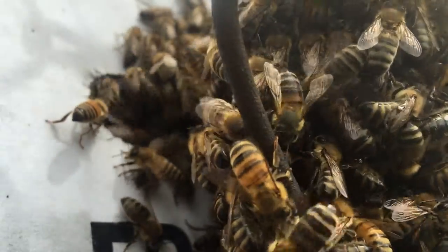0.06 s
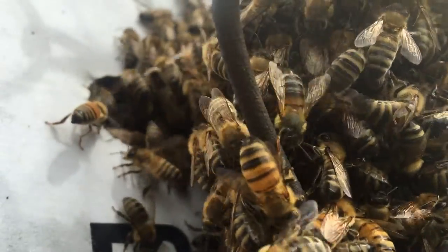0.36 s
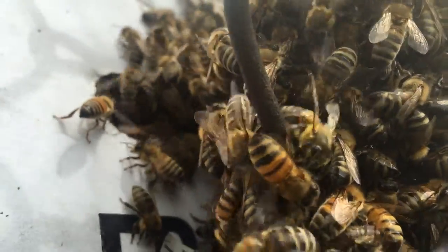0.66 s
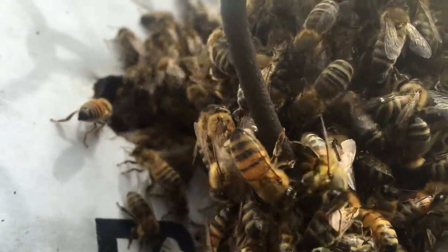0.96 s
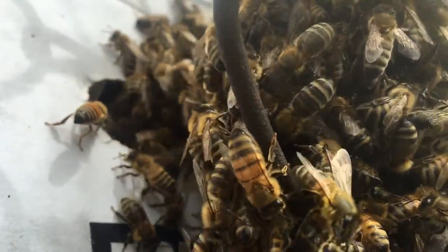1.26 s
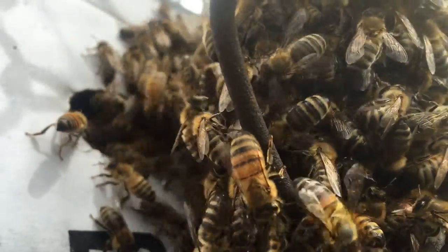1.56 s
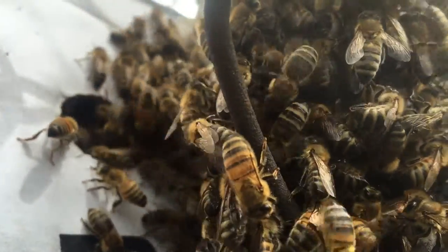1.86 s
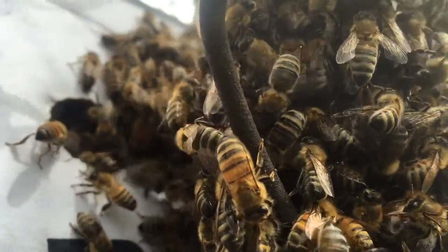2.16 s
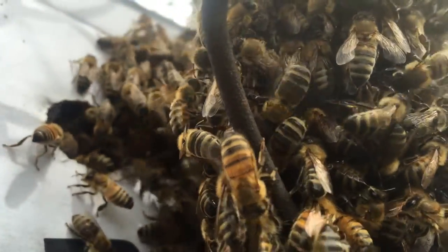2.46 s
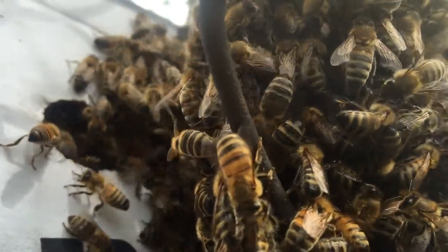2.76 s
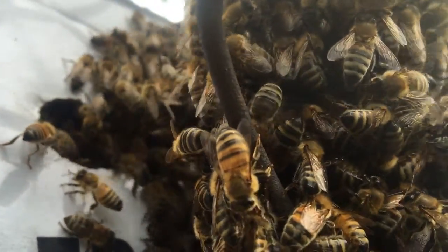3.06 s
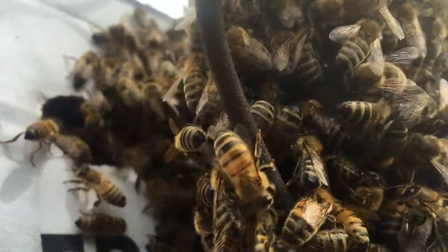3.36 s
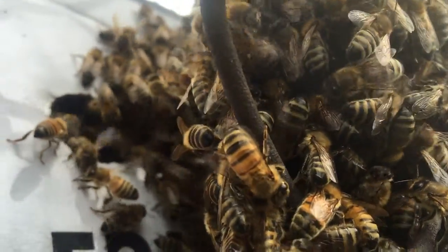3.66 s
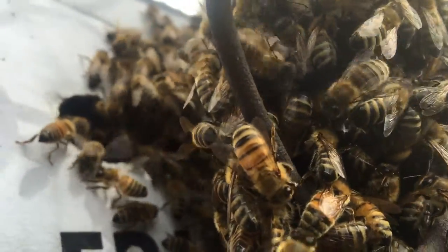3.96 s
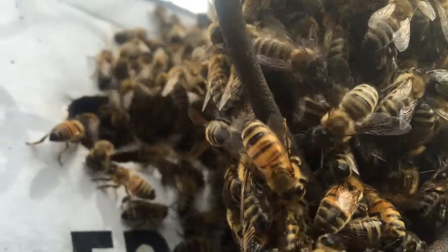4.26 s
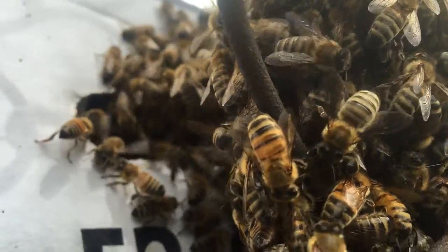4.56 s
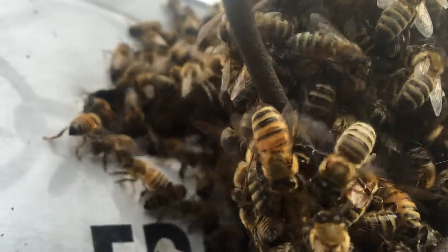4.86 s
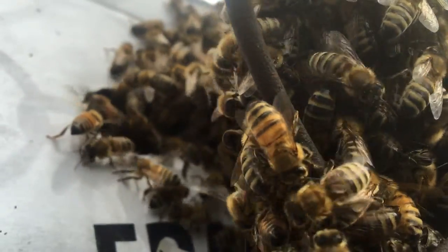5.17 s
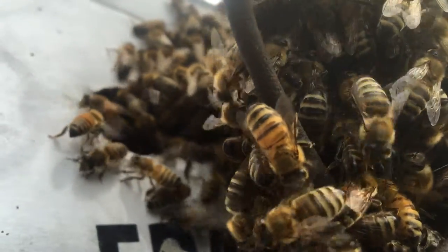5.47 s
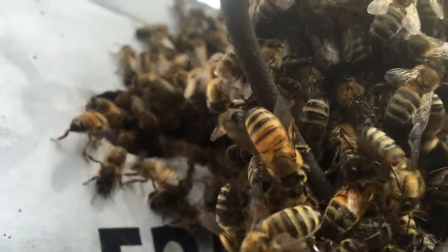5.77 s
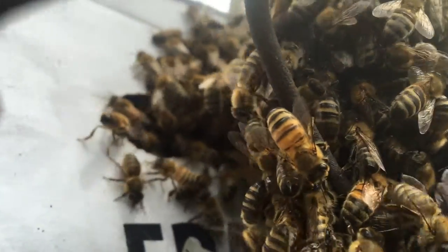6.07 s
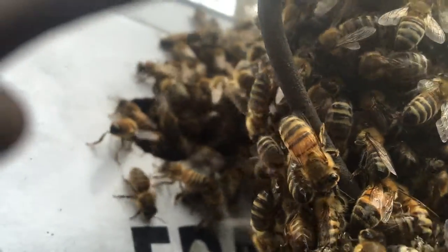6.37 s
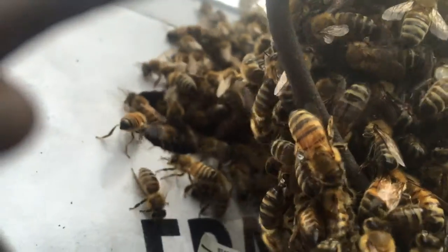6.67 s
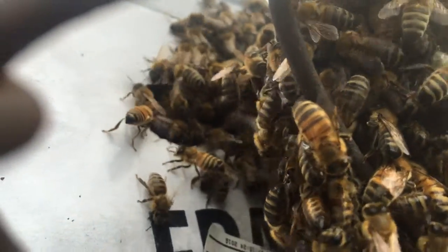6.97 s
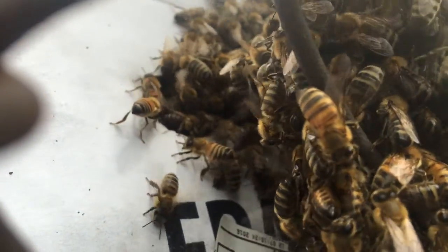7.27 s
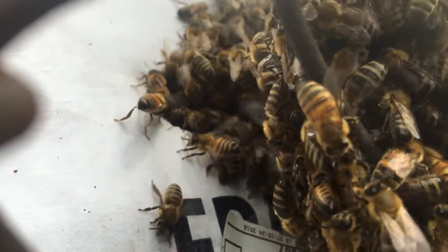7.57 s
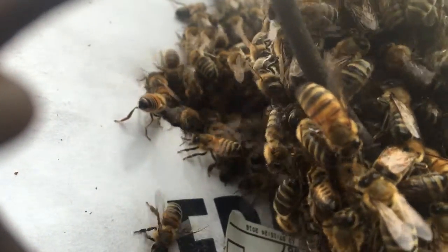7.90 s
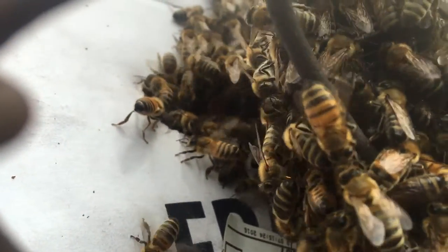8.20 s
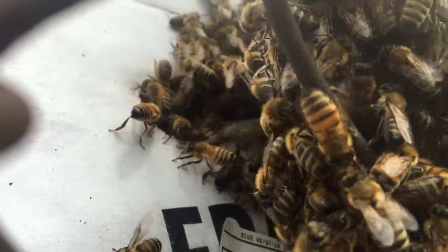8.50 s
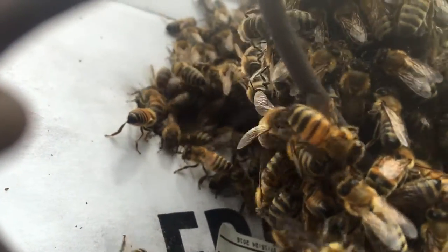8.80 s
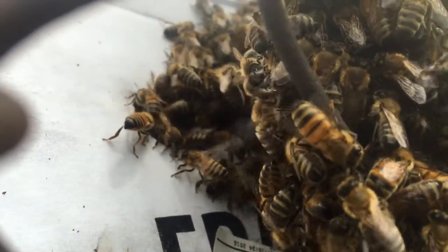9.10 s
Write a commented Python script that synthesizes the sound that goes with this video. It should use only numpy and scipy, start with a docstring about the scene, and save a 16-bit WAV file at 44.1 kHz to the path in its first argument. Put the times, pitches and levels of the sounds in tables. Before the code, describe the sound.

Close, steady hum and crawling rustle of many bees, with a few brief buzzes, early handling clicks and a low hand rumble.

```python
"""Honeybee cluster, close up

A hand-held camera's microphone is a few centimetres from the bees. Many wings hum near 190 Hz, one
air pulse a stroke; thousands of legs and wings rustle together, and now and then a jostled bee buzzes.
Fingers shift on the camera: sharp clicks of its case, dull bumps, short scuffs and a low rumble.
The camera adds a thin hiss of its own."""
import sys
import numpy as np
from scipy import signal
from scipy.fft import rfft, irfft, next_fast_len
from scipy.io import wavfile
from scipy.ndimage import map_coordinates

SR = 44100
rng = np.random.default_rng(int(sys.argv[2]) if len(sys.argv) > 2 else 0)


def wav_record(signal):
    """Record a signal, one row per channel, as 16-bit PCM in the file named by sys.argv[1]."""
    frames = np.transpose(np.atleast_2d(signal))
    bounded = np.clip(frames, -1, 1)
    # unit amplitude maps onto the largest positive 16-bit level
    quanta = np.round(bounded * 32767).astype(np.int16)
    wavfile.write(sys.argv[1], SR, quanta)


N = 403074

# how busy the cluster is; hum and rustle both follow it: (time [s], level [dB])
ACTIVITY = [(0.0, -52), (2.09, -51), (2.37, -54.5), (6.21, -52), (6.34, -52.5), (9.14, -52.5)]
# clicks of the case; low breadth is a narrow ring, high breadth a broad crack:
# (time [s], level [dB], breadth [dB], favoured ring [Hz], recoil relative to level [dB])
CASE_CLICKS = [(.5679, -7, 1, 2560, -9), (.641, -1.5, -7.5, 1890, -12), (0.7086, -9.5, -3, 3240, -14),
               (0.7223, -9, 5, 3840, -9), (0.7446, 0, -5, 3780, -20), (0.7492, -8.5, 3, 1690, -4.5),
               (0.7564, -2.5, -8, 1670, -14), (.7813, -25, 8, 4200, -12), (1.1286, -19, -11, 3050, -7),
               (1.1894, -9, -3, 4260, -29), (1.2322, -3, -7, 3100, -20), (1.282, 1.5, 6.5, 2850, -13),
               (1.2962, -6.5, 5.5, 3890, -21), (5.7585, -25.5, -12, 1130, -2.5),
               (5.8299, -33, -10, 2500, -17), (6.067, -29.5, -3, 3900, -8), (8.4202, -26, 0, 3870, -2.5),
               (8.4437, -26.5, 8, 1310, -2.5)]
# spectrum of a snap of the case: (frequency [Hz], level [dB])
SNAP_SPECTRUM = [(300, 3), (1500, -7.5), (3000, 2.5), (4300, -16), (5300, -15), (7000, -22), (10000, -22.5),
                 (16000, -39)]


def wing_hum():
    """Fanning bees hum low, a few nearest the microphone stand out, and a thin note holds steady."""
    # overtones of the crowd and of a bee close by: (frequency [Hz], level [dB])
    crowd_spectrum = [(100, -11), (170, -5), (390, 2), (520, -15), (650, -6), (900, -10), (1400, -13),
                      (2000, -16), (3000, -19.5), (5000, -43)]
    close_spectrum = [(100, 2.5), (170, 1.5), (370, 2), (500, -10.5), (640, 0), (850, -9), (1300, -6.5),
                      (2000, -19), (2950, -10.5), (3500, -20.5), (4100, -15.5), (4900, -35), (6200, -28.5),
                      (9000, -45)]
    busy_db, = curves(ACTIVITY)
    hum_db = 0.5 + busy_db.mean() + 0.26 * (busy_db - busy_db.mean())  # follows the activity weakly
    crowd = wings(crowd_spectrum, 157.86, 220.6, drift=.025, flutter=.008, swell_db=3.5, count=10)
    close = wings(close_spectrum, 166, 204, drift=.025, flutter=.004, swell_db=7, count=3)
    held = amp(1.2 * wobble(2.17)) * np.sin(2 * np.pi * np.cumsum(273 + 1.14 * wobble(4)) / SR)
    return amp(hum_db) * (amp(2.0) * crowd + amp(0.4) * close + amp(-9.5) * held)


def wings(spectrum, low_hz, high_hz, drift, flutter, swell_db, count):
    """Each bee beats at its own wandering pitch, one air pulse a stroke, and swells and fades."""
    strokes = np.zeros(N + 1)
    for pitch_hz in np.linspace(low_hz, high_hz, count):
        beat_hz = pitch_hz * (1 + drift * wobble(3) + flutter * wobble(35))
        turns = np.cumsum(beat_hz) / SR + rng.random()
        at = np.interp(np.arange(1, int(turns[-1])), turns, np.arange(N))
        whole = at.astype(int)
        size = amp(swell_db * np.tanh(wobble(3.5)[whole]))
        strokes[whole] += size * (1 - at % 1)  # each pulse is shared between two samples
        strokes[whole + 1] += size * (at % 1)
    return coloured(strokes[:N], spectrum)


def rustle():
    """Legs and wings of crawling bees rub together in thousands of tiny contacts a second."""
    # spectrum of the rubbing: (frequency [Hz], level [dB])
    spectrum = [(100, -39), (300, 6), (700, 0.5), (1350, 1.5), (1650, -5.5), (2100, -6), (2550, -3),
                (2950, 3), (3500, -11), (4100, -2), (4700, -14), (6900, -26), (7600, -30), (15000, -63)]
    busy_db, = curves(ACTIVITY)
    crawl = coloured(grains(per_s=6000, spread_db=1.5) + 0.54 * rng.standard_normal(N), spectrum)
    return amp(busy_db + 4.5 + 0.83 * wobble(16)) * crawl


def buzzes():
    """A jostled bee's wings flare up for a moment: a gliding train of sharp strokes."""
    # brief buzzes: (time [s], level [dB], pitch [Hz], glide [Hz/s], half length [s])
    flares = [(1.798, -55.5, 235.5, -12, 0.087), (2.22, -62, 201, 61, 0.089), (4.027, -58, 223.7, 4, 0.13),
              (7.773, -54, 283, 0, 0.036), (8.831, -58.5, 261.5, -64, 0.13)]
    # overtones of a buzz: (frequency [Hz], level [dB])
    spectrum = [(300, -16), (2000, -6), (2900, 1.5), (4300, -3.5), (5000, -20), (6200, -14), (10000, -31)]
    out, t = np.zeros(N), np.arange(-SR // 3, SR // 3) / SR
    for s, db, pitch_hz, glide, half in flares:
        turns = pitch_hz * t + glide * t ** 2 / 2
        strokes = np.cos(2 * np.pi * np.arange(1, 36)[:, None] * turns).sum(0)
        add(out, s + t[0], amp(db) * np.exp(-(t / half) ** 2) * coloured(strokes, spectrum))
    return out


def clicks():
    """A slip of the grip snaps the case and the camera recoils; the spot struck decides the ring."""
    # modes of the case: (frequency [Hz], level [dB], time to fall 60 dB [s])
    case_modes = [(535, -14.5, 0.033), (1210, -18, 0.029), (1640, -9, 0.022), (1853, -13.5, 0.023),
                  (2410, -44, .014), (3073, -2.5, 0.011), (3580, -2.5, 0.0081), (3920, 0.5, 0.0075),
                  (4180, 5, 0.0058), (6520, -14, 0.0096)]
    out, t = np.zeros(N), np.arange(SR // 16) / SR
    hz, level_db, t60 = np.transpose(case_modes)[:, :, None]
    for s, db, breadth_db, ring_hz, recoil_db in CASE_CLICKS:
        strength, detune, phase = rng.standard_normal((3, len(case_modes), 1))
        favour_db = 7 * np.exp(-(np.log(hz / ring_hz) / 0.1) ** 2)
        decay = amp(level_db + favour_db + 2 * strength - 60 * t / t60)
        modes = decay * np.sin(2 * np.pi * (hz * (1 + 0.022 * detune) * t + phase))
        snap = coloured(rng.standard_normal(len(t)), SNAP_SPECTRUM) * amp(-60 * t / 0.0069)
        contact = modes.sum(0) * (1 - np.exp(-t / 0.00045)) + 0.88 * snap * (1 - np.exp(-t / 0.00009))
        tone = [(1200, 2 + breadth_db), (2800, 0), (4500, 0), (7000, 1.5 + breadth_db)]
        add(out, s, amp(db - 24.5) * coloured(contact, tone))
        add(out, s + .0015, amp(db + recoil_db) * swing(start_hz=236, final_hz=78.5))
    return out


def chatter():
    """After each click the case settles with a few fine, bright ticks."""
    strain, t = np.zeros(N), np.arange(SR // 5) / SR
    for s, db, *_ in CASE_CLICKS:
        add(strain, s, amp(db - 40.5) * np.exp(-t / 0.015))
    ticks = coloured(grains(per_s=260, spread_db=1), SNAP_SPECTRUM)
    return strain * unit(passed(ticks, 5900, "high", order=2))


def bumps():
    """Soft fingertips push the camera without a click."""
    # pushes of the hand: (time [s], peak [dB], starting pitch [Hz], final pitch [Hz])
    pushes = [(1.661, -31, 300, 108), (1.816, -30.5, 257, 112), (2.076, -21, 316, 51.7),
              (2.309, -8.5, 308, 55.6), (2.486, -18, 261, 55), (2.668, -30, 298, 145),
              (4.002, -21, 109, 59.5), (5.408, -36.5, 330, 170), (5.709, -26.5, 129, 54.6),
              (7.864, -29.5, 160, 84.6)]
    out = np.zeros(N)
    for s, db, start_hz, final_hz in pushes:
        add(out, s, amp(db) * swing(start_hz, final_hz))
    return out


def swing(start_hz, final_hz, settle_s=0.0028, t60_s=0.11):
    """A push swings the camera; its pitch sinks as the finger gives way. Peak 1."""
    t = np.arange(SR // 3) / SR
    pitch = final_hz + (start_hz - final_hz) * np.exp(-t / settle_s)
    motion = np.sin(2 * np.pi * np.cumsum(pitch) / SR) * amp(-60 * t / t60_s)
    push = passed(motion, 1.54 * start_hz, "low", order=3)
    return push / np.abs(push).max()


def handling_noises():
    """Short handling noises: grainy scuffs, one dull knock and a low lingering rumble."""
    # bursts of noise: (time [s], level [dB], rise [s], fall [s], low-pass cutoff [Hz])
    bursts = [(.742, -37, 0.028, .02, 14000), (1.02, -41, 0.056, 0.064, 2540),
              (1.29, -25, .006, 0.036, 16000), (1.32, -23, 0.062, 0.082, 298),
              (2.078, -24.5, .0015, .004, 1400), (5.77, -48, 0.023, 0.043, 4970),
              (6.075, -37, 0.027, 0.064, 5100), (6.16, -43, 0.02, 0.033, 2200)]
    # their shared spectrum: (frequency [Hz], level [dB])
    spectrum = [(40, -14), (100, 3), (180, 4), (400, -4), (1400, -7), (2200, -12.5), (3000, -8.5),
                (4300, -13), (5200, -25), (15000, -39)]
    out, t = np.zeros(N), np.arange(N) / SR
    texture = coloured(grains(per_s=4300, spread_db=1.0), spectrum)
    for s, db, rise, fall, cutoff_hz in bursts:
        envelope = np.exp(-np.minimum(np.maximum((s - t) / rise, (t - s) / fall), 20))
        out += amp(db) * envelope * passed(texture, cutoff_hz, "low", order=2)
    return out


def grip_rumble(still_db=-48.5):
    """The trembling hand rumbles through the camera to the microphone, more as the fingers shift."""
    # shifts of the hold: (time [s], level [dB], half length [s])
    regrips = [(1.0, -43.5, 0.72), (2.24, -40, 0.16), (6.043, -36.5, 0.075), (6.595, -43, .35),
               (7.897, -44.5, 0.37)]
    # spectrum of the rumble: (frequency [Hz], level [dB])
    spectrum = [(15, -38), (30, -21.5), (46, -3), (85, -2.5), (125, -9.5), (200, -14), (400, -31),
                (1000, -80)]
    t = np.arange(N) / SR
    swells = sum(amp(db) ** 2 * np.exp(-((t - s) / half) ** 2) for s, db, half in regrips)
    level = np.sqrt(amp(still_db) ** 2 + swells)
    return level * amp(1.73 * wobble(9.7)) * coloured(rng.standard_normal(N), spectrum)


def hiss(floor_db=-78.5, step_db=6.5, ramp_s=0.046):
    """The camera's own thin, high hiss twice steps up for about a second."""
    # spells of louder hiss: (start [s], end [s])
    spells = [(.7, 1.85), (2.08, 3.05)]
    # spectrum of the hiss: (frequency [Hz], level [dB])
    spectrum = [(2000, -28), (6000, 7.5), (9700, 10), (10400, 0), (11200, 7), (16000, -3)]
    t = np.arange(N) / SR
    raised = sum(np.clip(np.minimum(t - start, end - t) / ramp_s + .5, 0, 1) for start, end in spells)
    return amp(floor_db + step_db * raised) * coloured(rng.standard_normal(N), spectrum)


def amp(db):
    """Decibels to amplitude."""
    return 10 ** (np.asarray(db) / 20)


def unit(x):
    """x at rms 1."""
    return x / np.sqrt(np.mean(x ** 2) + 1e-20)


def curves(rows):
    """One value per sample for each column after the time."""
    s, *cols = np.transpose(rows)
    return [np.interp(np.arange(N) / SR, s, c) for c in cols]


def wobble(per_s):
    """A smooth random curve with per_s knots a second."""
    coarse = np.arange(0, N + 64, 64)
    knots = rng.standard_normal(2048)
    return np.interp(np.arange(N), coarse, map_coordinates(knots, [coarse * per_s / SR], mode="wrap"))


def filtered(x, response):
    """x with each frequency scaled by response(hz)."""
    size = next_fast_len(len(x) + 8192)
    return irfft(rfft(x, size) * response(np.fft.rfftfreq(size, 1 / SR)), size)[:len(x)]


def coloured(x, spectrum):
    """x shaped by (frequency [Hz], level [dB]) points joined on a log axis, at rms 1."""
    point_hz, point_db = np.transpose(spectrum)
    return unit(filtered(x, lambda hz: amp(np.interp(np.log(hz + 1), np.log(point_hz + 1), point_db))))


def passed(x, hz, kind, order):
    """A causal low-pass or high-pass."""
    return signal.sosfilt(signal.butter(order, min(hz, SR / 2 - 1), kind, fs=SR, output="sos"), x)


def grains(per_s, spread_db):
    """Tiny contacts at random times and of uneven size, at rms 1."""
    contacts = (rng.random(N) < per_s / SR) * rng.standard_normal(N)
    return unit(contacts * amp(spread_db * rng.standard_normal(N)))


def add(track, s, sound):
    """Mix a sound into a track from time s on."""
    part = track[max(round(s * SR), 0):][:len(sound)]
    part += sound[:len(part)]


def scene():
    """The bees, the hand on the camera and the camera's own hiss, in one channel."""
    handling = grip_rumble() + clicks() + chatter() + handling_noises() + bumps()
    return (wing_hum() + rustle() + buzzes() + handling + hiss())[None]


def record(dry):
    """The camera cuts the deepest bass, rounds off the highest peaks and keeps nothing above 16 kHz."""
    x = passed(dry[0], 16, "high", order=2)
    x = x / (1 + (x / .7) ** 6) ** (1 / 6)
    return filtered(x, lambda hz: hz < 16000)[None]


dry = scene()
out = record(dry)
wav_record(out)
```